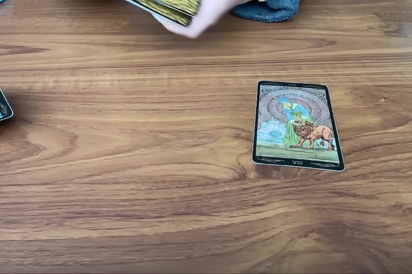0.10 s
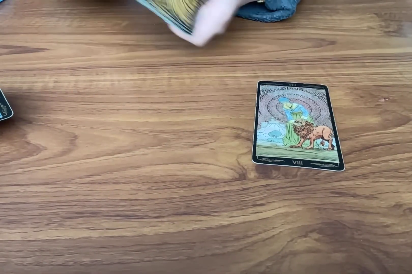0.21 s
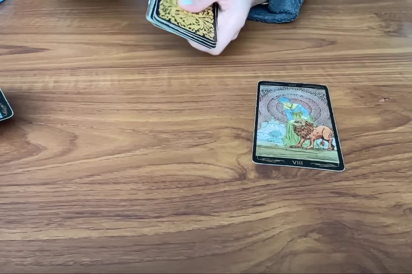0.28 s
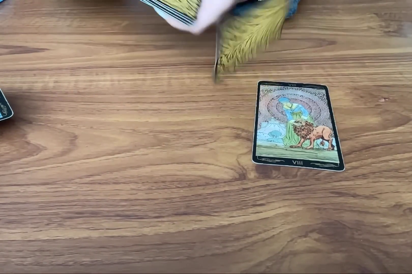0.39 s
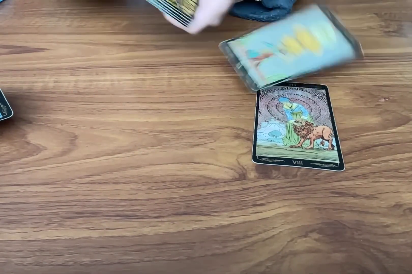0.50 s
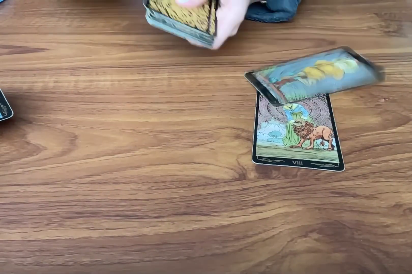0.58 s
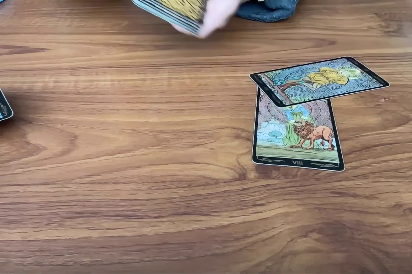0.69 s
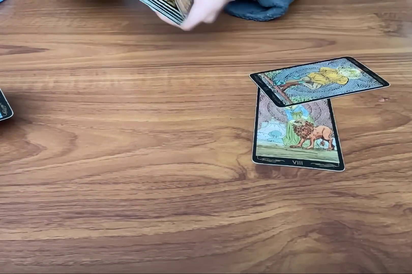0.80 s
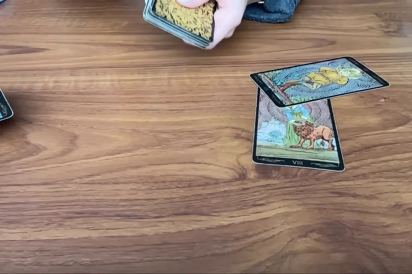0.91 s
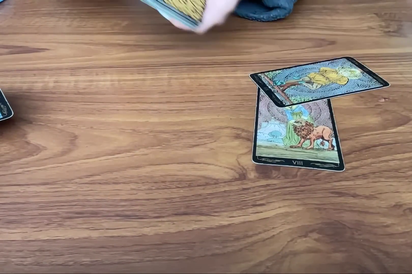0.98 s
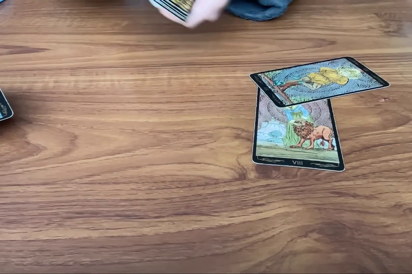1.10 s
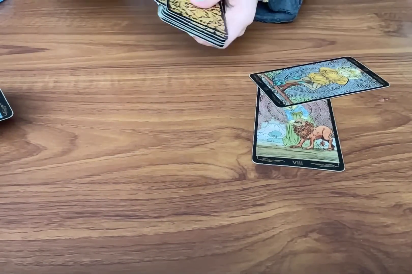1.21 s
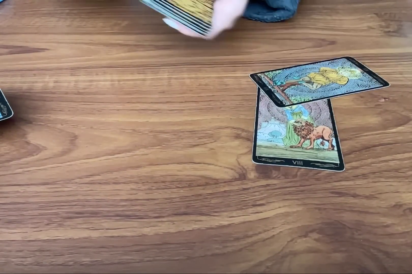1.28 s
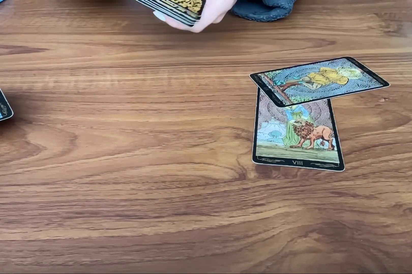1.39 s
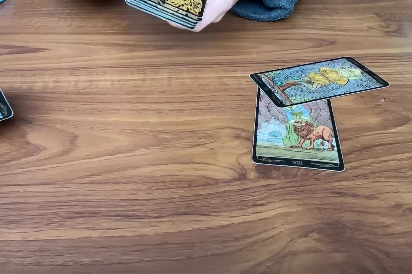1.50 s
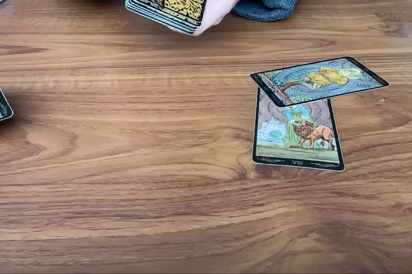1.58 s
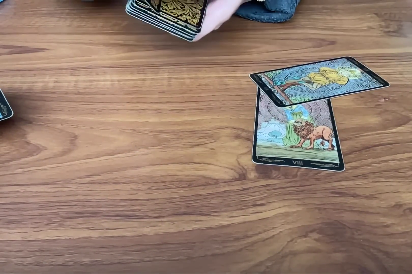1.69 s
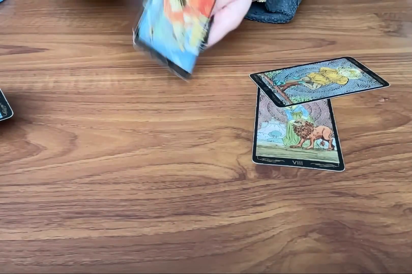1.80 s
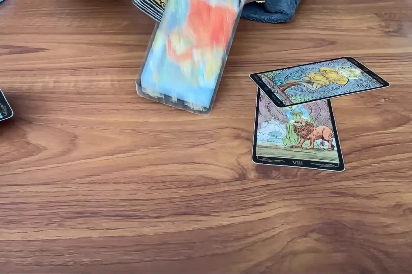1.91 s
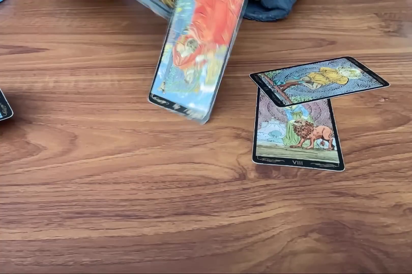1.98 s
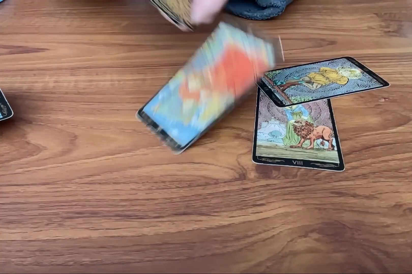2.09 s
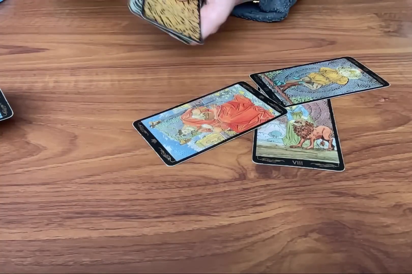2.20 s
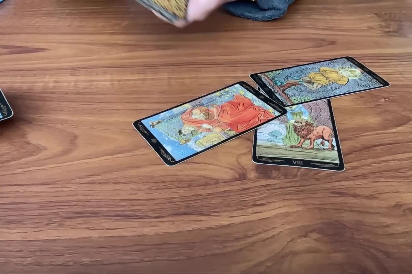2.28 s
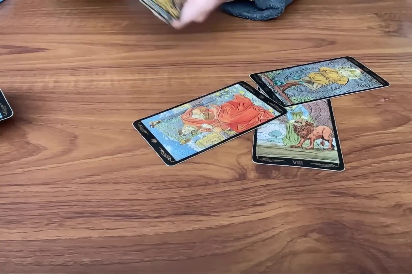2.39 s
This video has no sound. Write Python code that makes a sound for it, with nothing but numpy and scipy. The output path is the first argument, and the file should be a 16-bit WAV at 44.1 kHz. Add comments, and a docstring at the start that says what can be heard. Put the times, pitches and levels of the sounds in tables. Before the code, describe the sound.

Cards being dealt from a handled deck, sharp snaps and light flicks, in a small room

```python
"""First the hiss of an earlier packet dies away over handling rumble; then large cards are shuffled and dealt
onto a wooden table, close to the microphone in a small room. Slaps, flicks and thuds are short noise bursts
and decaying tones; slides and scrapes are shaped friction noise; puffs of air are slow swings of pressure.
The room answers with decaying noise echoes, and the hardest slaps overload the microphone."""
import sys
import numpy as np
from scipy import signal
from scipy.io import wavfile

SR = 44100
rng = np.random.default_rng(int(sys.argv[2]) if len(sys.argv) > 2 else 0)


def generate_wav(signal):
    """Clip the signal to [-1, 1] and save it as 16-bit WAV at the path in sys.argv[1]."""
    frames = np.transpose(np.atleast_2d(signal))
    scaled = np.clip(frames, -1, 1) * 32767
    pcm = np.round(scaled).astype(np.int16)
    wavfile.write(sys.argv[1], SR, pcm)


N = 108045

# Cards slapping hard against the deck; the room level is relative to the slap:
# start_s, length_s, knock_db, card_db, ring_hz, ring_share (0-1), edge_db, room_db
SLAP_EVENTS = [(.4257, 0.0024, -23.5, 2, 1990, 0.97, -26, -5.5),
               (0.4313, 0.0027, -12, 1.5, 1840, .35, -9.5, -4.5),
               (0.5866, 0.0041, -12.5, -4, 3420, 0.45, -4, -11.5),
               (.592, 0.0034, -7.5, -0.5, 3160, 0.7, -16, -16.5),
               (0.8729, 0.0088, -4, -1, 3180, 0.47, -12, -13),
               (2.146, 0.0063, -36, -6, 3230, 0.94, -36, -16),
               (2.154, 0.0072, -14.5, -7.5, 3000, 0.65, -24, -36)]
# Card edges flicking and tapping: start_s, knock_db, card_db, ring_hz, edge_db
FLICK_EVENTS = [(.1715, -28, -21, 4330, -26.5), (.189, -22.5, -30, 2900, -21),
                (0.2205, -50, -26, 3020, -39), (.2386, -13, -12, 1420, -13.5),
                (0.2637, -13, -25, 1500, -20), (0.2707, -14, -12.5, 2970, -13.5),
                (0.276, -9.5, -18, 2900, -17), (.2917, -11.5, -16, 4460, -20),
                (.2955, -25, -21.5, 2980, -20), (0.5184, -30, -22, 2370, -20.5),
                (.555, -10, -7.5, 2560, -17.5), (0.6295, -30, -24, 4420, -16.5),
                (.6834, -54, -45, 4500, -29.5), (0.788, -37, -28.5, 3460, -22.5),
                (0.7932, -40, -45, 3500, -22.5), (.7999, -17.5, -15, 3750, -18.5),
                (.806, -12.5, -18, 2170, -21), (0.8107, -29, -19.5, 1200, -24),
                (0.8327, -30, -25, 3870, -40), (0.8368, -17, -21, 2430, -41),
                (.888, -10.5, -4.5, 3870, -4.5), (1.0765, -47, -18.5, 2190, -23.5),
                (1.0913, -23, -25, 2490, -23.5), (1.1436, -26.5, -24.5, 2440, -29),
                (1.154, -28.5, -29, 1490, -42), (1.2247, -16, -8.5, 3420, -7), (1.228, -20, -12, 3270, -27),
                (1.3414, -27, -28, 2170, -50), (1.3453, -31, -14, 2420, -15),
                (1.3511, -27, -14.5, 3170, -21.5), (1.358, -25.5, -29, 3020, -47),
                (1.3709, -26, -11.5, 2940, -44.5), (1.3865, -33, -14.5, 1930, -27),
                (1.3914, -29.5, -20, 3160, -22.5), (1.4048, -37, -30, 3060, -34),
                (1.4132, -32, -24, 2890, -49), (1.426, -42.5, -23, 3010, -45),
                (1.4324, -32.5, -24.5, 1200, -29.5), (1.7818, -33, -27.5, 1710, -21.5),
                (1.813, -17.5, -31, 900, -27), (1.8225, -30, -21, 2730, -26.5),
                (1.8376, -28.5, -30, 2410, -40), (1.8781, -29.5, -30.5, 2770, -29),
                (1.9575, -19.5, -8, 3250, -13.5), (1.9644, -18.5, -16.5, 3060, -19),
                (2.0181, -28, -23.5, 3450, -26), (2.0429, -24, -18, 2400, -17.5),
                (2.066, -27.5, -25.5, 2970, -20.5), (2.103, -52, -31, 1680, -30.5),
                (2.1655, -15, -2.5, 2810, -9.5), (2.378, -31, -30, 3270, -37.5),
                (2.3856, -26, -31.5, 3740, -27.5), (2.4192, -28.5, -34.5, 2500, -29.5),
                (2.4257, -26.5, -31, 1470, -35)]
# Dull knocks of hand, card and deck: start_s, level_db, pitch_hz, decay_s
THUD_EVENTS = [(0.19, -18.5, 345, 0.0032), (0.205, -25, 182, 0.0063), (.432, -9, 720, 0.0092),
               (.433, -5.5, 1090, 0.0061), (0.441, -17, 175.5, 0.024), (.437, -28, 123, 0.087),
               (.595, -25, 113, 0.03), (.80, -23, 70.6, 0.02), (.805, -19.5, 244, 0.0073),
               (.873, -16, 335, 0.014), (.875, -11, 530, 0.0093), (1.0917, -11.5, 423, 0.0024),
               (1.213, -22, 135, 0.023), (1.8125, -14.5, 912, 0.0037), (1.882, -30.5, 293, 0.014),
               (1.958, -23, 812, 0.012), (2.065, -22, 298, 0.0045), (2.066, -27, 131, 0.04),
               (2.139, -20.5, 124, 0.022), (2.386, -21, 172, 0.0085)]
# Cards sliding over each other: start_s, end_s, start_db, end_db, tilt_db_per_octave
SLIDE_EVENTS = [(0.121, 0.238, -43, -41.5, 3), (0.226, 0.278, -43.5, -20, -1), (.56, 0.576, -31, -28, 1),
                (0.575, 0.587, -20, -16, 2.5), (0.791, 0.811, -28.5, -24, -2),
                (0.831, .868, -37, -30.5, -0.5), (0.867, 0.879, -20, -1.5, -2),
                (1.035, 1.05, -49, -40.5, -0.5), (1.101, 1.19, -44, -33.5, 3.5),
                (1.193, 1.213, -30, -21.5, 0.5), (1.239, 1.294, -48, -40, 0.5),
                (1.346, 1.428, -39, -39, -6.5), (1.568, 1.581, -57, -52, 2), (1.877, 1.884, -36.5, -34, -3),
                (1.743, 1.779, -48, -35, 0.5), (1.777, 1.82, -36, -34.5, -0.5),
                (2.028, 2.125, -38.5, -34.5, 1.5), (2.126, 2.152, -20.5, -13.5, 3),
                (2.365, 2.453, -48, -39.5, 3.5)]
# Card edges scraping over the pack: start_s, end_s, level_db, resonance_hz
SCRAPE_EVENTS = [(1.235, 1.257, -30, 802), (1.397, 1.43, -37, 2980), (1.767, 1.805, -35, 1640),
                 (1.799, 1.856, -41.5, 970), (2.104, 2.135, -33.5, 2170)]
# Air pushed out by a closing packet: centre_s, level_db
PUFF_EVENTS = [(.274, -18), (0.439, -25), (.598, -20.5), (0.891, -20.5), (1.22, -17), (2.164, -19)]
# Spectrum of the deck's knock: frequency_hz, level_db
KNOCK_SPECTRUM = [(40, -20), (130, 3), (330, 5), (600, 1), (1000, -0.5), (1600, -26), (4000, -42.5),
                  (16000, -63.5)]
# Spectrum of the card's body: frequency_hz, level_db
CARD_SPECTRUM = [(100, 1), (600, -9), (1200, -0.5), (2200, -1.5), (3400, 2), (5000, -4.5), (7000, -12),
                 (16000, -33.5)]
# Spectrum of the edge's tick and hiss: frequency_hz, level_db
EDGE_SPECTRUM = [(100, -35.5), (2000, -16.5), (4500, 0.5), (6300, -1.5), (9000, 2), (12000, -6.5),
                 (16000, -10)]
# Spectrum of rubbing cards: frequency_hz, level_db
RUB_SPECTRUM = [(40, -14.5), (300, 7), (900, 0), (2000, -1), (3300, -1.5), (6200, -3), (9500, -2.5),
                (12500, -6.5), (16000, -10.5)]
# Time the room takes to fall by 60 dB: frequency_hz, decay_s
ROOM_DECAY = [(100, 0.36), (400, 0.29), (1200, 0.28), (3000, 0.29), (8000, 0.29), (16000, 0.23)]
# Spectrum the room gives its echoes: frequency_hz, level_db
ROOM_SPECTRUM = [(40, -9.5), (150, -4), (400, -2), (800, -4.5), (2500, -4), (6000, -7.5), (10000, -2),
                 (16000, -8.5)]
# Spectral shape of the room hiss: frequency_hz, level_db
HISS_SPECTRUM = [(15, -31.5), (25, 1.5), (70, -14), (242, -21), (624, -26.5), (695, -31.5), (3160, -35),
                 (6380, -41), (9840, -36.5), (14800, -46.5), (16000, -46.5)]
# Spectral shape of the handling rumble: frequency_hz, level_db
RUMBLE_SPECTRUM = [(20, -1.5), (60, 1.5), (130, 0.5), (220, -11.5), (450, -25.5), (1000, -62.5),
                   (4000, -67)]
# Level of the handling rumble: time_s, level_db
RUMBLE_LEVEL = [(0, -43.5), (.25, -42), (.75, -48.5), (1.05, -48), (1.12, -32.5), (1.42, -44.5),
                (1.5, -63.5), (1.76, -53.5), (1.84, -48.5), (2.08, -34.5), (2.33, -47.5), (2.42, -40.5)]

SLAP_RELEASE_S, SLAP_WIDTH_HZ = 0.00064, 440
KNOCK_DECAY_S, CARD_DECAY_S, EDGE_DECAY_S, RING_DECAY_S = 0.0039, 0.0013, 0.0013, 0.0013
# Shares of power: ring within the card sound, first instant within a burst
RING_SHARE, CRACK_SHARE, KNOCK_CRACK_SHARE = 0.55, 0.26, 0.38
THUD_RISE_S = 0.00294
CATCHES_PER_S, CATCH_SPREAD_DB = 1300, 4
SMOOTH_SHARE, SLIDE_FADE_S = 0.68, 0.003  # the even part of the rub, as a share of power
SCRAPE_WIDTH_HZ = 320
PUFF_WIDTH_S = 0.0062
FLICK_ROOM_DB, FRICTION_ROOM_DB = -11, -9.5
EARLY_DB, EARLY_DECAY_S = -1, 0.007  # close reflections, relative to the tail
HISS_DB = -50
OPENING_DB, OPENING_FALL_DB_PER_S = -29, 199
CLIP_LEVEL, CLIP_KNEE = 0.77, 2.4  # a higher knee turns more sharply
CUT_HZ = 16100


def slap(length, knock_db, card_db, ring_hz, ring_share, edge_db, size=2048):
    """Many edges land within milliseconds and keep the cards ringing. Returns near and far sound."""
    t = np.arange(size) / SR
    envelope = np.exp(-np.maximum(t - length, 0) / SLAP_RELEASE_S)
    ring = resonate(burst(CARD_SPECTRUM, envelope), ring_hz, SLAP_WIDTH_HZ)
    body = unit(burst(CARD_SPECTRUM, envelope))
    knock = amp(knock_db) * unit(burst(KNOCK_SPECTRUM, envelope))
    card = amp(card_db) * blend(ring, body, ring_share)
    edge = amp(edge_db) * unit(burst(EDGE_SPECTRUM, envelope))
    # Longer slaps carry more energy
    near = (knock + card + edge) * np.sqrt(np.mean(envelope ** 2))
    far = unit(spread(knock_db, card_db, edge_db)) * np.std(near)
    return near, far


def flick(knock_db, card_db, ring_hz, edge_db, size=2048):
    """An edge lets go: a tick, a few cycles of the stiff card and a dull knock. Returns near and far sound."""
    t = np.arange(size) / SR
    ring = blip(np.sin(2 * np.pi * ring_hz * t) * np.exp(-t / RING_DECAY_S))
    body = blip(burst(CARD_SPECTRUM, np.exp(-t / CARD_DECAY_S), CRACK_SHARE))
    knock = blip(burst(KNOCK_SPECTRUM, np.exp(-t / KNOCK_DECAY_S), KNOCK_CRACK_SHARE))
    card = blip(blend(ring, body, RING_SHARE))
    edge = blip(burst(EDGE_SPECTRUM, np.exp(-t / EDGE_DECAY_S), CRACK_SHARE))
    near = amp(knock_db) * knock + amp(card_db) * card + amp(edge_db) * edge
    return near, spread(knock_db, card_db, edge_db)


def thud(level_db, pitch_hz, decay):
    """A soft blow with one low, quickly dying note."""
    t = np.arange(SR // 3) / SR
    envelope = np.minimum(t / THUD_RISE_S, 1) * np.exp(-t / decay)
    return amp(level_db) * np.sin(2 * np.pi * pitch_hz * t) * envelope


def slide(length, start_db, end_db, tilt_db, size=1024):
    """Card faces rub: a fine hiss with tiny catches."""
    length = max(length, SLIDE_FADE_S)
    t = np.arange(round(length * SR) + size) / SR
    caught = rng.random(len(t)) < CATCHES_PER_S / SR
    strength = amp(CATCH_SPREAD_DB * np.minimum(rng.exponential(1, len(t)), 4))
    catches = unit(caught * strength * rng.choice([-1, 1], len(t)))
    drive = blend(rng.standard_normal(len(t)), catches, SMOOTH_SHARE)
    fade = np.minimum(t / SLIDE_FADE_S, 1) * np.exp(-np.maximum(t - length, 0) / SLIDE_FADE_S)
    level = amp(np.interp(t, [0, length], [start_db, end_db]))
    return unit(colour(drive, RUB_SPECTRUM, tilt_db)) * fade * level


def scrape(length, level_db, hz):
    """Fine friction swells and fades in one resonance of the bent card."""
    count = max(round(length * SR), 64)
    friction = resonate(noise(RUB_SPECTRUM, count), hz, SCRAPE_WIDTH_HZ)
    return amp(level_db) * friction * np.sqrt(np.hanning(count))


def puffs():
    """Each puff of escaping air is one slow swing of pressure at the microphone."""
    t = np.arange(N) / SR
    pressure = np.zeros(N)
    for centre, level_db in PUFF_EVENTS:
        x = (t - centre) / PUFF_WIDTH_S
        pressure += amp(level_db) * (x ** 2 - 1) * np.exp(-x ** 2 / 2)
    return pressure


def spread(knock_db, card_db, edge_db, size=2048):
    """What a hit throws into the room: over all directions its spectrum is smooth."""
    hz = abs(np.fft.fftfreq(size, 1 / SR))
    levels = amp([knock_db, card_db, edge_db])
    spectra = (KNOCK_SPECTRUM, CARD_SPECTRUM, EDGE_SPECTRUM)
    power = sum((level * unit(amp(read(part, hz)))) ** 2 for level, part in zip(levels, spectra))
    return blip(causal(np.sqrt(power))) * np.linalg.norm(levels)


def room(x):
    """Close reflections, then a tail in which each band dies at its own speed."""
    t = np.arange(SR) / SR
    hz, at, bands = signal.stft(rng.standard_normal(SR), SR, nperseg=256)
    decay = np.exp(-np.log(1000) * at / read(ROOM_DECAY, hz)[:, None])
    tail = signal.istft(bands * decay, SR, nperseg=256)[1][:SR]
    tail = tail * np.minimum(t / 0.01, 1)
    # Sparse reflections, none in the first 2 ms
    sparse = rng.standard_normal(SR) * (rng.random(SR) < 0.05)
    early = sparse * np.exp(-t / EARLY_DECAY_S) * (t > 0.002)
    echo = tail / np.linalg.norm(tail) + amp(EARLY_DB) * early / np.linalg.norm(early)
    return colour(signal.fftconvolve(x, echo)[:N], ROOM_SPECTRUM)


def background():
    """Room hiss, the rumble of the hands and the dying ring of an earlier packet, all as coloured noise."""
    t = np.arange(N) / SR
    hiss = amp(HISS_DB) * noise(HISS_SPECTRUM, N)
    rumble = amp(np.interp(t, *np.transpose(RUMBLE_LEVEL))) * noise(RUMBLE_SPECTRUM, N)
    opening = amp(OPENING_DB - OPENING_FALL_DB_PER_S * t) * noise(RUB_SPECTRUM, N, tilt_db=-2.0)
    return hiss + rumble + opening


def burst(points, envelope, crack=0):
    """A first crack and a cluster of tiny contacts under an envelope, coloured by what they strike."""
    contacts = unit(rng.choice([-1., 1.], len(envelope)) * envelope)
    contacts[0] = 0
    first = unit(signal.unit_impulse(len(envelope)))
    return colour(blend(first, contacts, crack), points)


def resonate(x, hz, width_hz):
    """One resonance, at rms 1."""
    pole = np.exp((2j * np.pi * hz - np.pi * width_hz) / SR)
    return unit(signal.lfilter([1], [1, -pole], x).real)


def noise(points, count, tilt_db=0):
    """Steady coloured noise of rms 1."""
    return unit(colour(rng.standard_normal(count), points, tilt_db))


def colour(x, points, tilt_db=0, size=2048):
    """Filters with the given spectrum and a tilt per octave about 5 kHz."""
    hz = abs(np.fft.fftfreq(size, 1 / SR))
    octaves = np.log2((hz + 500) / 5500)  # the offset flattens the tilt in the bass
    pulse = causal(amp(read(points, hz) + tilt_db * octaves))
    return signal.fftconvolve(x, pulse)[:len(x)]


def causal(gain, size=2048):
    """The minimum-phase pulse: these gains round the frequency circle, with energy as early as possible."""
    return np.fft.ifft(np.exp(np.conj(signal.hilbert(np.log(gain))))).real[:size]


def read(points, hz):
    """Reads a table over log frequency."""
    f, value = np.transpose(points)
    return np.interp(np.log(hz + 1), np.log(f + 1), value)


def blend(a, b, share):
    """Mixes two sounds, a with the given share of the power."""
    share = np.clip(share, 0, 1)
    return np.sqrt(share) * a + np.sqrt(1 - share) * b


def amp(db):
    """Decibels to gain."""
    return 10 ** (np.asarray(db) / 20)


def unit(x):
    """Scales to rms 1."""
    return x / np.sqrt(np.mean(x ** 2) + 1e-20)


def blip(x):
    """Scales to the energy of one millisecond at rms 1."""
    return x / np.sqrt(np.sum(x ** 2) * 1000 / SR + 1e-20)


def add(mix, s, sound):
    """Mixes a sound in at time s, in seconds."""
    part = mix[max(round(s * SR), 0):][:len(sound)]
    part += sound[:len(part)]


def scene(count=5):
    """All card sounds, near and in the room; successive hits in the list take different paths through it."""
    near, friction, far = np.zeros(N), np.zeros(N), np.zeros((count, N))
    hits = [(s, slap(*row), room_db) for s, *row, room_db in SLAP_EVENTS]
    hits += [(s, flick(*row), FLICK_ROOM_DB) for s, *row in FLICK_EVENTS]
    for k, (s, (direct, thrown), room_db) in enumerate(hits):
        add(near, s, direct)
        add(far[k % count], s, amp(room_db) * thrown)
    for s, *row in THUD_EVENTS:
        add(near, s, thud(*row))
    for start, end, *row in SLIDE_EVENTS:
        add(friction, start, slide(end - start, *row))
    for start, end, *row in SCRAPE_EVENTS:
        add(friction, start, scrape(end - start, *row))
    echoes = sum(room(path) for path in far) + amp(FRICTION_ROOM_DB) * room(friction)
    return (near + friction + puffs() + echoes + background())[None]


def record(dry):
    """The close microphone bends loud peaks smoothly towards its limit; then a low-pass ends the band."""
    clipped = dry / (1 + abs(dry / CLIP_LEVEL) ** CLIP_KNEE) ** (1 / CLIP_KNEE)
    low_pass = signal.firwin(301, CUT_HZ, window=("kaiser", 9), fs=SR)
    return signal.oaconvolve(clipped, low_pass[None], "same")


dry = scene()
out = record(dry)
generate_wav(out)
```